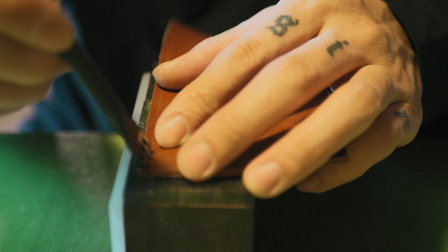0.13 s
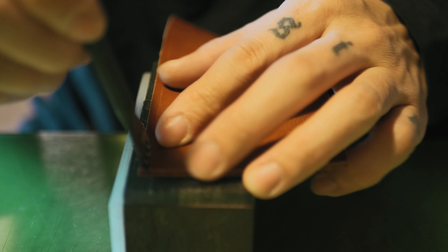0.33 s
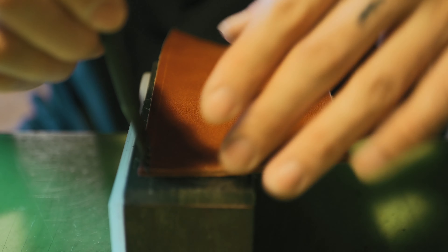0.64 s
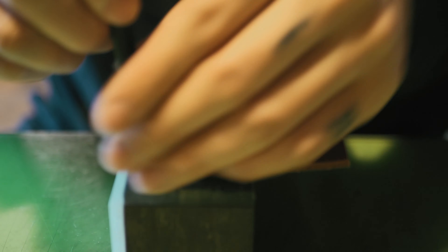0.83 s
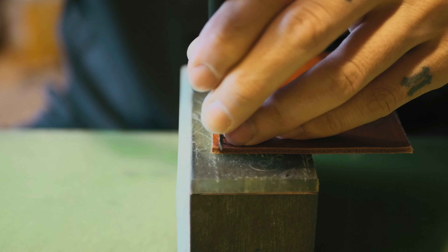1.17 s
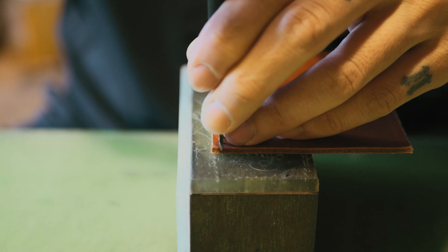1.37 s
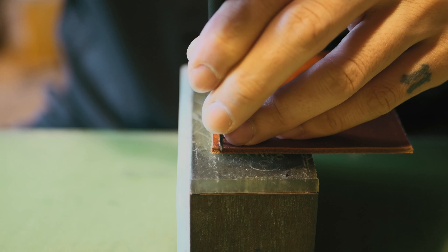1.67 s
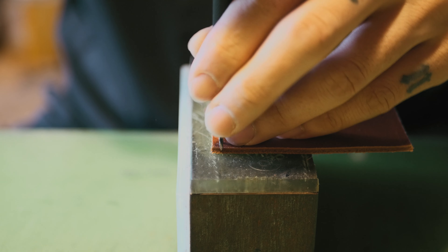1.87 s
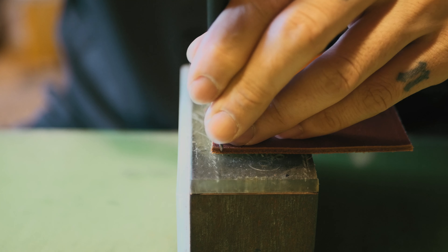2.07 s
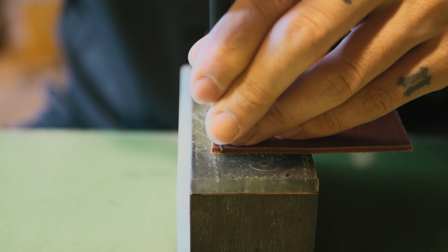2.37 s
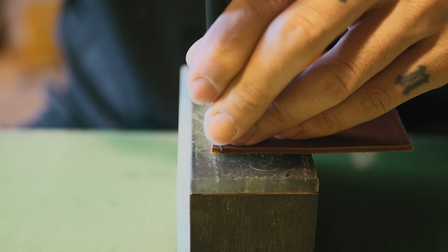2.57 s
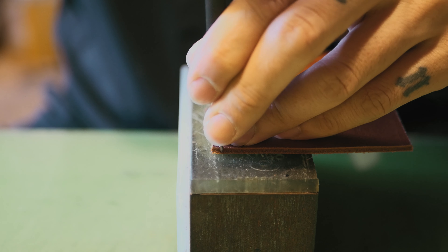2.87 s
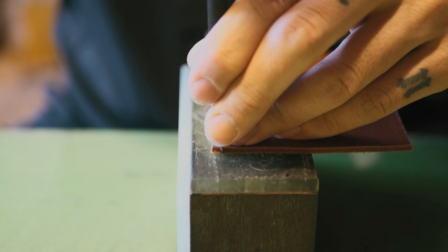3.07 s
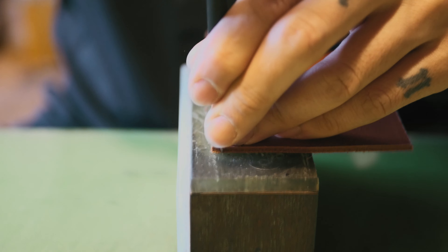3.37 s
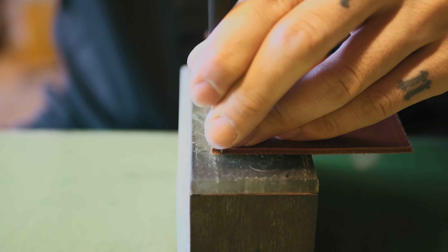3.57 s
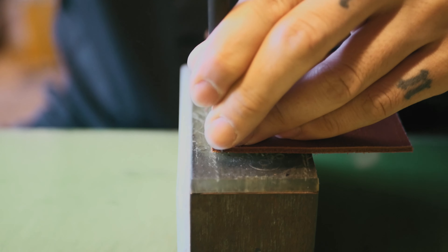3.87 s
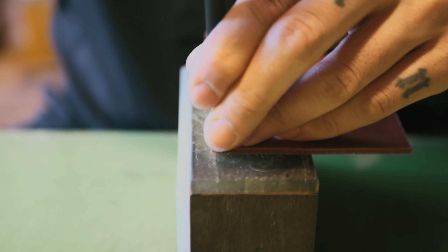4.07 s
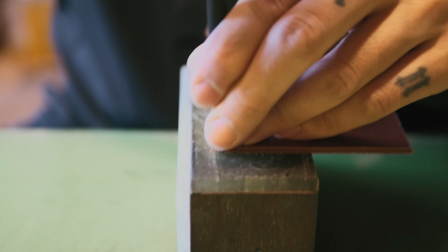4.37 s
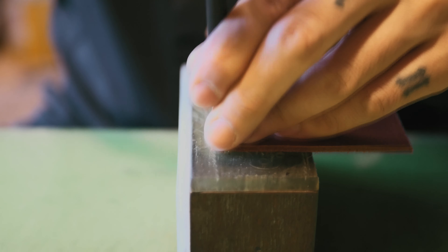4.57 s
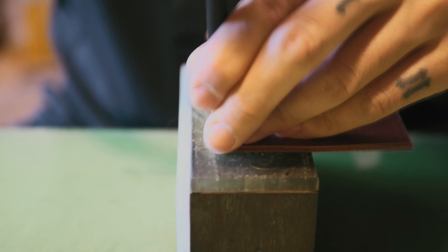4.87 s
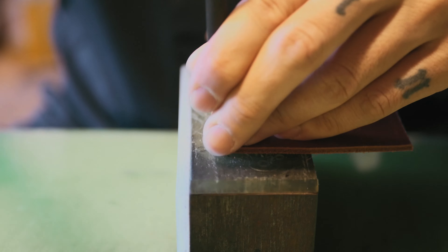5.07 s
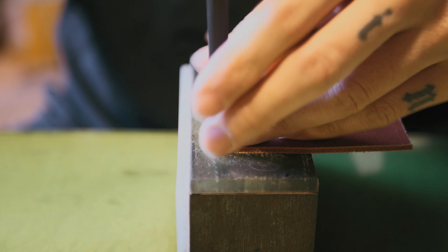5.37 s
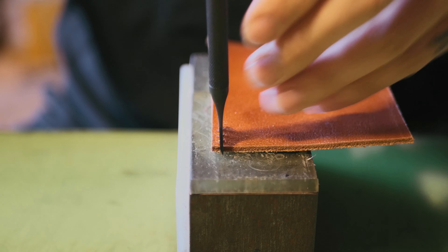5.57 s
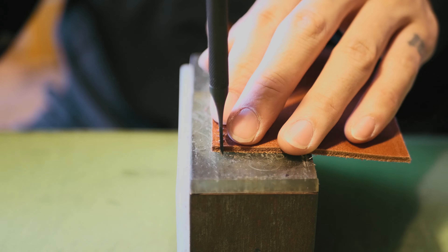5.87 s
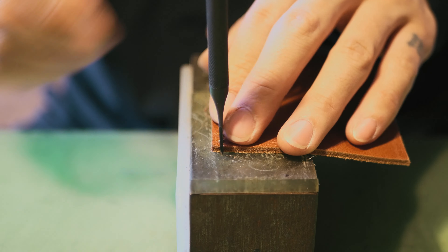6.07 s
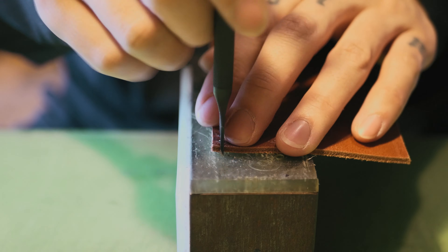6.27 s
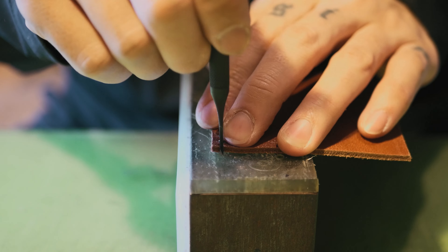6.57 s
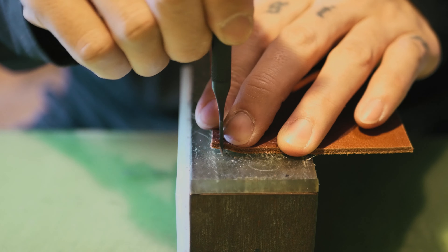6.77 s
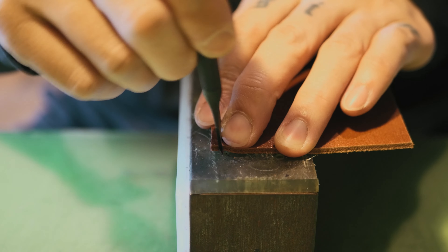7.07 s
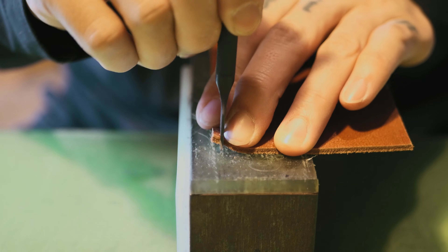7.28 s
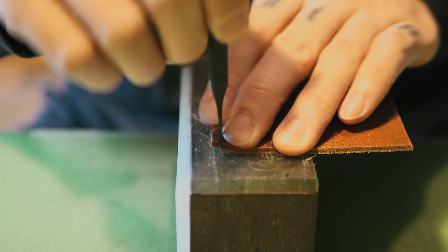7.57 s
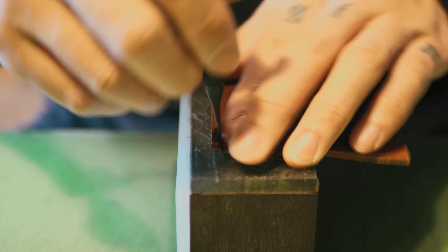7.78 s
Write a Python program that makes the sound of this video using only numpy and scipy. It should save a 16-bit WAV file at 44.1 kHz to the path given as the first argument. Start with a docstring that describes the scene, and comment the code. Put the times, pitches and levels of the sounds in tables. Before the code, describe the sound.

Inside a small workshop with faint traffic outside, fingers brush leather. A mallet gives a steel chisel three dull easy taps, then seven hard, fairly regular blows that grow crunchier and brighter, shaking the bench and overloading the close stereo microphone. The mallet is laid down with a thud, a steel tool clinks and bounces, and soft leather rustle remains over distant traffic.

```python
"""Traffic passes far outside a small workshop and fingers slide on leather; then a mallet drives a steel chisel.
Three easy taps lead to seven hard blows, and the blows brighten as the tines go through the leather.
Each blow is a sum of decaying modes behind a contact low-pass; it shakes the bench and can overload the microphone.
The mallet is put down with a thud and clinks against a steel tool, both again modal; a short room tail follows.
Traffic, friction and rumble are shaped noises whose powers add."""
import sys
import numpy as np
from scipy import signal
from scipy.fft import rfft, irfft, next_fast_len
from scipy.io import wavfile

SR = 44100
rng = np.random.default_rng(int(sys.argv[2]) if len(sys.argv) > 2 else 0)


def dump(signal):
    """Clip the signal to [-1, 1] and save it as 16-bit WAV at the path in sys.argv[1]."""
    limited = np.clip(np.atleast_2d(signal).T, -1, 1)
    pcm = np.round(limited * 32767).astype(np.int16)
    wavfile.write(sys.argv[1], SR, pcm)


N = 348953
BAND_EDGES_HZ = 22 * 2 ** np.arange(0, 10, .5)   # half octaves


def from_db(db):
    """Level definition: decibels become an amplitude gain."""
    return 10 ** (np.asarray(db) / 20)


def rms_one(x):
    """Normalisation: scale a signal to unit rms."""
    return x / np.sqrt(np.mean(x ** 2) + 1e-20)


def at_hz(points, hz):
    """Spectral interpolation: read a curve linearly along a log-frequency axis."""
    table = np.array(points)
    return np.interp(np.log(hz), np.log(table[:, 0]), table[:, 1])


def low_pass(x, hz, order=2):
    """Causal Butterworth low-pass: attenuate what lies above a corner frequency."""
    return signal.sosfilt(signal.butter(order, min(hz, .45 * SR), fs=SR, output="sos"), x)


def delayed(x, samples):
    """Linear phase: a phase slope delays by a fractional number of samples and keeps the treble."""
    size = next_fast_len(len(x) + SR // 10)
    phase = -2j * np.pi * np.arange(size // 2 + 1) * samples / size
    return irfft(rfft(x, size) * np.exp(phase), size)[:len(x)]


def add(track, s, sound):
    """Superposition: mix a sound into a track at time s in seconds."""
    start = round(s * SR)
    track[..., start:start + sound.shape[-1]] += sound[..., :N - start]


def drift(rate):
    """Random modulation: straight lines join normal random knots, `rate` of them per second."""
    knots = rng.standard_normal(int(N / SR * rate) + 2)
    return np.interp(np.arange(N) / SR * rate, np.arange(len(knots)), knots)


def noise_bands(likeness, size):
    """Interchannel correlation: mix mid and side noise in each half octave, as (centre Hz, stereo band)."""
    white = rng.standard_normal((2, 2, size))
    for k, (low, high) in enumerate(zip(BAND_EDGES_HZ, BAND_EDGES_HZ[1:])):
        band_pass = signal.butter(2, [low, high], "band", fs=SR, output="sos")
        # neighbouring bands take different noises
        mid, side = signal.sosfilt(band_pass, white[k % 2])
        hz = np.sqrt(low * high)
        alike = np.clip(at_hz(likeness, hz), -1, 1)
        common = np.sqrt((1 + alike) / 2) * mid
        opposed = np.sqrt((1 - alike) / 2) * side * [[1], [-1]]
        yield hz, common + opposed


def burst(db, t60, low_hz, high_hz):
    """Exponential decay: a dying scrunch of many tiny contacts, as band noise one second long."""
    t = np.arange(SR) / SR
    band = signal.butter(2, [low_hz, min(high_hz, .45 * SR)], "band", fs=SR, output="sos")
    grit = rms_one(signal.sosfilt(band, rng.standard_normal(len(t))))
    return from_db(db) * grit * np.exp(-np.minimum(np.log(1000) * t / t60, 40))


def strike(modes, contact_hz, scrunch, detune=0):
    """Modal synthesis: one contact starts every mode, and a soft contact spares the high ones."""
    t = np.arange(len(scrunch)) / SR
    sound = scrunch.copy()
    # loudness, and pitch if detune is set, vary from strike to strike
    variations = rng.standard_normal((len(modes), 2))
    for (hz, t60, db), (loud, sharp) in zip(modes, variations):
        life = t[:int(2 * t60 * SR)]
        # heavy, low modes take a moment to get going
        rise = 1 - np.exp(-life / .012 * (hz / 100) ** 2)
        decay = np.exp(-np.log(1000) * life / t60)
        tone = np.sin(2 * np.pi * hz * (1 + detune * sharp) * life)
        sound[:len(life)] += from_db(db + loud / 2) * rise * decay * tone
    return low_pass(sound, contact_hz, order=3)


def at_depth(modes, depth):
    """Changing boundary condition: mode levels pass from cushioned to hard as the tines sink."""
    return [(hz, t60, soft_db + depth * (hard_db - soft_db)) for hz, t60, soft_db, hard_db in modes]


def contact_brightness(force_db, depth):
    """Contact duration: force and depth shorten the contact and raise the low-pass corner in Hz."""
    # a light tap on cushioned tines is dull
    octaves_per_force_db, octaves_when_through = 0.11, 0.69
    return 2400 * 2 ** (octaves_per_force_db * force_db + octaves_when_through * depth)


def knocks(events, modes, rattle_db, rattle_t60, low_hz, high_hz):
    """Repeated excitation: several contacts ring one object, each with a brief rattle."""
    out = np.zeros(N)
    for s, force_db, contact_hz in events:
        rattle = burst(rattle_db, rattle_t60, low_hz, high_hz)
        add(out, s, from_db(force_db) * strike(modes, contact_hz, rattle))
    return out


def without_deep_bass(x):
    """High-pass filtering: remove the deep-bass excess of damped sines that start abruptly."""
    return signal.sosfilt(signal.butter(2, 51, "high", fs=SR, output="sos"), x)


# Colour of the reverberant tail. Each row: frequency in Hz, relative level in dB.
TAIL_COLOUR = [(180, -4), (400, -13), (800, -9), (1500, -8.5), (3000, -11.5), (4600, -9.5), (6000, -12.5),
               (8000, -12.5), (14000, -12.5)]
# Reverberation time of the workshop. Each row: frequency in Hz, t60 in seconds.
TAIL_T60 = [(180, 0.21), (600, 0.3), (1500, 0.24), (4000, 0.23), (8000, 0.21), (14000, 0.17)]
# Similarity of left and right in the tail. Each row: frequency in Hz, correlation from -1 to 1.
TAIL_LIKENESS = [(180, 0.71), (1000, 0.59), (2500, 0.67), (6000, 0.46), (14000, 0)]


def workshop(x, pan_db, room_db):
    """Room impulse response: direct sound, then noise that decays band by band, denser at a wall echo."""
    t = np.arange(SR // 2) / SR
    response = 0
    for hz, band in noise_bands(TAIL_LIKENESS, len(t)):
        decay = np.log(1000) / at_hz(TAIL_T60, hz)
        if hz > TAIL_COLOUR[0][0]:   # the noise tail is left out below this; modes carry the lows
            equal_energy = np.sqrt(2 * decay / SR)
            response = response + band * from_db(at_hz(TAIL_COLOUR, hz)) * np.exp(-decay * t) * equal_energy
    # a cluster of echoes off the nearest wall, 10.5 ms late
    wall = 1 + 1.4 * np.exp(-((t - .0105) / .002) ** 2)
    response = response * wall * (1 - np.exp(-t / .004))
    # the left leads by 1.7 samples; pan_db is how much louder it is than the right
    left, right = x * from_db(pan_db / 2), delayed(x, 1.7) * from_db(-pan_db / 2)
    tail = signal.oaconvolve(x[None], response, axes=1)[:, :len(x)]
    return np.array([left, right]) + from_db(room_db) * tail


# Vehicles passing outside.
# Each row: nearest point in seconds, roar in dB, tyre hum in dB, time to fade by 3 dB in seconds.
VEHICLES = [(.45, -41, -51.5, 0.37), (6.5, -50, -50, 0.53)]
# Spectrum of the roar. Each row: frequency in Hz, relative density in dB per Hz.
ROAR_SPECTRUM = [(30, 7), (70, -3), (135, 3.5), (200, -6.5), (320, -0.5), (520, -9.5), (900, -7.5),
                 (1300, -0.5), (1800, -7.5), (2600, -15.5), (4000, -23), (8000, -36.5), (15000, -42)]
# Spectrum of the tyre hum. Each row: frequency in Hz, relative density in dB per Hz.
TYRE_SPECTRUM = [(150, -13.5), (300, -0.5), (520, 1), (850, 7.5), (1200, -5.5), (2000, -28.5),
                 (15000, -59.5)]


def traffic():
    """Inverse-square law: each vehicle drives a straight line, its power falling with distance squared."""
    t = np.arange(N) / SR
    # the steady traffic behind the vehicles
    roar, tyres = from_db(-52) ** 2, from_db(-59.5) ** 2
    for s, roar_db, tyres_db, fade_s in VEHICLES:
        nearness = 1 / (1 + ((t - s) / fade_s) ** 2)
        roar = roar + from_db(roar_db) ** 2 * nearness
        tyres = tyres + from_db(tyres_db) ** 2 * nearness
    return [(ROAR_SPECTRUM, 10 * np.log10(roar)), (TYRE_SPECTRUM, 10 * np.log10(tyres))]


# Low background rumble. Each row: frequency in Hz, relative density in dB per Hz.
RUMBLE_SPECTRUM = [(28, -13), (45, 4), (72, 0.5), (110, -12.5), (200, -13), (1000, -56), (15000, -71.5)]


def rumble():
    """Stationary noise with slow modulation: a low rumble wanders in level."""
    return [(RUMBLE_SPECTRUM, -54 + drift(1.6))]


# Fingers shifting the leather.
# Each row: fastest moment in seconds, friction in dB, time to swell or fade (to 1/e in power) in seconds.
FINGER_SLIDES = [(.51, -56.5, 0.15), (.98, -58.5, 0.065), (5.82, -58, 0.11), (6.21, -53.5, 0.12),
                 (7.74, -58, 0.19)]
# Spectrum of skin on leather. Each row: frequency in Hz, relative density in dB per Hz.
FRICTION_SPECTRUM = [(500, -39.5), (2000, -2.5), (3800, -1), (6000, -6), (10000, -10), (15000, -16)]


def fingers():
    """Friction noise: each slide of skin on leather speeds up and slows down, gripping unevenly."""
    t = np.arange(N) / SR
    holding_db = -62   # faint rustle of the hands between slides
    grip_flicker_db, grip_flickers_per_s = 1.1, 59
    slides = sum(from_db(db) ** 2 * np.exp(-((t - s) / swell_s) ** 2) for s, db, swell_s in FINGER_SLIDES)
    friction_db = 10 * np.log10(from_db(holding_db) ** 2 + slides)
    return [(FRICTION_SPECTRUM, friction_db + grip_flicker_db * drift(grip_flickers_per_s))]


# Similarity of left and right in the background. Each row: frequency in Hz, correlation from -1 to 1.
BACKGROUND_LIKENESS = [(60, -0.205), (130, 0.17), (290, 0.603), (640, 0.58), (1410, 0.55), (3100, 0.55),
                       (6820, 0.04), (15000, 0.017)]


def surroundings():
    """Addition of powers: traffic, rumble and friction, as (spectrum, rms dB in time), sum in every band."""
    layers = traffic() + rumble() + fingers()
    centres = np.sqrt(BAND_EDGES_HZ[1:] * BAND_EDGES_HZ[:-1])
    shares = np.array([from_db(at_hz(spectrum, centres)) ** 2 for spectrum, db in layers])
    # each spectrum is scaled to unit total power
    totals = shares @ np.diff(BAND_EDGES_HZ) * 2 / SR
    shares = shares / totals[:, None]
    powers = np.array([from_db(db) ** 2 for spectrum, db in layers])
    bands = noise_bands(BACKGROUND_LIKENESS, N)
    return sum(np.sqrt(share @ powers) * band for share, (hz, band) in zip(shares.T, bands))


# Mallet on chisel. Each row: start in seconds, relative force in dB, depth of the tines from 0 to 1.
MALLET_BLOWS = [(1.2336, 0.5, 0.21), (1.436, 4, 0.22), (2.7064, -7, 0), (3.0026, 7, 0.56),
                (3.3928, 9.5, 0.54), (3.7306, 10, 0.81), (4.0375, 9.5, 0.87), (4.3265, 9.5, 0.95),
                (4.6076, 11, 0.96), (4.9012, 10, 0.99)]
# Modes of chisel, block and bench. Each row: frequency in Hz, t60 in seconds,
# level in dB with the tines cushioned in leather, level in dB with the tines through.
CHISEL_MODES = [(66.7, 0.29, -12.5, -34.5), (115.7, 0.1, -11, -19), (125.6, 0.22, -16, -32),
                (192.8, 0.12, -17.5, -27), (250, 0.062, -16.5, -26.5), (309, 0.044, -19, -19),
                (362.6, 0.084, -32, -26), (444, 0.016, -38, -9), (579, .016, -43, -6.5),
                (711, 0.037, -42.5, -24.5), (1127, 0.032, -18.5, -22), (1407, 0.044, -15, -30),
                (1700, 0.01, -3.5, -5), (2470, 0.0077, -8.5, -6), (2910, 0.0049, -10.5, 2),
                (3435, 0.0052, -15.5, -5.5), (4275, 0.0026, -30, 1), (6300, .004, -51.5, -20),
                (10040, 0.0017, -50, -11.5)]


def chisel():
    """Impact excitation: blows ring chisel, block and bench; deeper tines crunch louder and brighter."""
    out = np.zeros((2, N))
    for s, force_db, depth in MALLET_BLOWS:
        crunch = burst(db=-17.5 + 5.6 * depth, t60=0.021, low_hz=770, high_hz=2800 + 8500 * depth)
        # the bench top trembles on between blows
        tremble = burst(db=-45, t60=0.99, low_hz=50, high_hz=143)
        modes, contact_hz = at_depth(CHISEL_MODES, depth), contact_brightness(force_db, depth)
        blow = strike(modes, contact_hz, crunch + tremble, detune=.03)
        # each blow gets a fresh noise tail, so no random colour repeats
        add(out, s, workshop(-from_db(force_db) * without_deep_bass(blow), pan_db=2.0, room_db=-1.5))
    return out


# The bench rocking the microphone sideways. Each row: frequency in Hz, t60 in seconds,
# level in dB with the tines cushioned, level in dB with the tines through.
ROCKING_MODES = [(47, 1.2, -35, -32.5), (65, .27, -2.5, -25), (74, .2, -2.5, -21), (205, .15, -28, -29),
                 (250, .12, -34, -29), (330, .15, -36, -32)]


def sway():
    """Structure-borne vibration: the bench takes a moment to rock, then shudders; left opposes right."""
    out = np.zeros(N)
    # a thud rocks the bench less than a blow of the same force
    jolts = list(MALLET_BLOWS) + [(s, force_db - 12.5, 0) for s, force_db, contact_hz in BENCH_THUDS]
    for s, force_db, depth in jolts:
        shudder = low_pass(burst(db=-35, t60=1.1, low_hz=42, high_hz=85), 90, order=4)
        swing = strike(at_depth(ROCKING_MODES, depth), contact_brightness(force_db, depth), shudder)
        build_up = 1 - np.exp(-np.arange(len(swing)) / SR / .032)
        add(out, s, from_db(force_db) * swing * build_up)
    pan_db = 3.5   # left over right
    return np.array([out * from_db(pan_db / 2), -out * from_db(-pan_db / 2)])


# Mallet head laid on the bench, and hands bumping it.
# Each row: start in seconds, relative force in dB, contact brightness in Hz.
BENCH_THUDS = [(1.868, -20.5, 117), (3.123, -30.5, 3200), (5.4019, -3, 2760), (5.885, -31.5, 490),
               (5.925, -33.5, 1100), (6.30, -22.5, 109), (7.495, -18.5, 115.6)]
# Modes of the bench top. Each row: frequency in Hz, t60 in seconds, level in dB.
BENCH_TOP_MODES = [(65.8, 0.31, -20.5), (121.3, 0.17, -14), (209.7, 0.22, -18.5), (318, 0.18, -21.5),
                   (403, .012, 0), (627, 0.12, -19.5), (900, .012, -4), (1550, 0.0034, 0.5),
                   (2220, 0.004, -12.5), (4830, 0.00071, 10)]


def bench():
    """Plate modes: the mallet head and the hands ring the bench top, to the left."""
    thuds = knocks(BENCH_THUDS, BENCH_TOP_MODES, rattle_db=-14.5, rattle_t60=0.12, low_hz=136.6, high_hz=830)
    return workshop(without_deep_bass(thuds), pan_db=6.0, room_db=-14.5)


# Steel tool knocked and bouncing.
# Each row: start in seconds, relative force in dB, contact brightness in Hz.
STEEL_CLINKS = [(5.6914, 1, 6400), (5.7270, -7.5, 6000), (5.7465, -12.5, 5000)]
# Modes of the steel tool on the bench. Each row: frequency in Hz, t60 in seconds, level in dB.
STEEL_TOOL_MODES = [(76.2, 0.52, -40), (140.6, 0.185, -32), (351, 0.014, -13.5), (607, 0.15, -29),
                    (890, 0.066, -63), (1116, 0.18, -30.5), (1274, 0.016, -15), (1800, 0.0046, -4),
                    (2610, 0.022, -21.5), (3200, 0.0044, -21), (3190, 0.038, -12.5), (3540, 0.011, -11.5),
                    (5480, 0.045, -24), (8350, .06, -40)]


def steel_tool():
    """Bouncing contact: each knock rings the modes of the steel tool on the bench, to the left."""
    clinks = knocks(STEEL_CLINKS, STEEL_TOOL_MODES, rattle_db=-18, rattle_t60=0.02, low_hz=930, high_hz=5550)
    return workshop(without_deep_bass(clinks), pan_db=6.0, room_db=0)


def scene():
    """Superposition: the chisel lies slightly left of centre; the thuds and clinks lie further left."""
    return surroundings() + chisel() + sway() + bench() + steel_tool()


def gain_control(x, threshold_db, share, recovery_db_per_s, attack_s):
    """Dynamic compression: peaks turn the gain down, too late for the crack itself; it then creeps back."""
    peak_db = 20 * np.log10(np.abs(x).max(axis=0) + 1e-9)
    cut_db = share * np.maximum(peak_db - threshold_db, 0)
    # hold the largest cut while it recovers along a straight line in dB
    ramp = recovery_db_per_s * np.arange(N) / SR
    held_db = np.maximum.accumulate(cut_db + ramp) - ramp
    pole = np.exp(-1 / (attack_s * SR))
    return x * from_db(-signal.lfilter([1 - pole], [1, -pole], held_db))


def record(dry):
    """Microphone chain: bass roll-off, gain control, flat-topped saturation and a steep top cut."""
    heard = signal.sosfilt(signal.butter(2, 30, "high", fs=SR, output="sos"), dry)
    level = gain_control(heard, threshold_db=8, share=0.54, recovery_db_per_s=14.0, attack_s=0.0028)
    clipped = level / (1 + level ** 8) ** (1 / 8)
    top_cut = signal.ellip(10, .1, 70, 16000, fs=SR, output="sos")
    return signal.sosfilt(top_cut, .93 * clipped)


dry = scene()
out = record(dry)
dump(out)
```